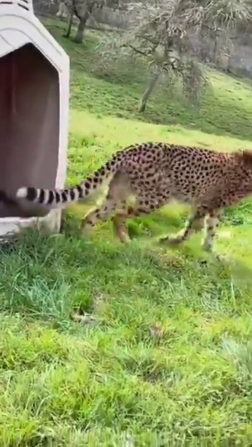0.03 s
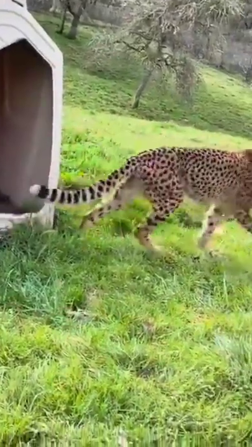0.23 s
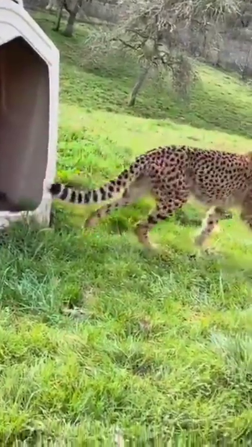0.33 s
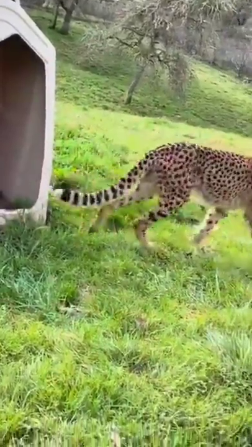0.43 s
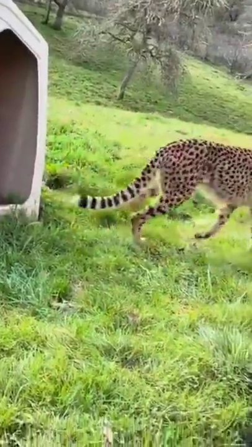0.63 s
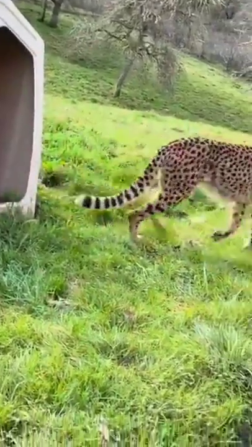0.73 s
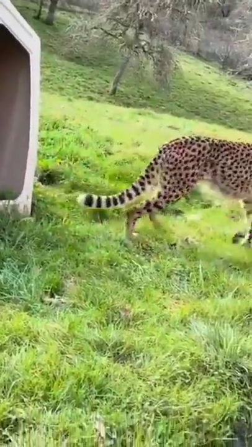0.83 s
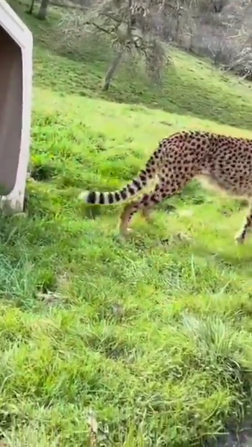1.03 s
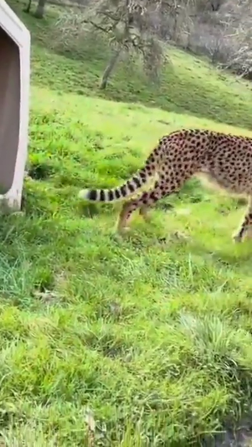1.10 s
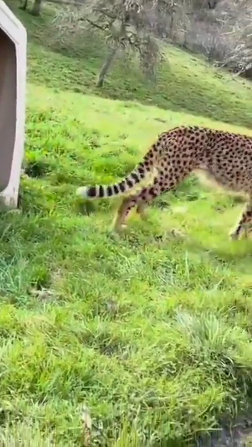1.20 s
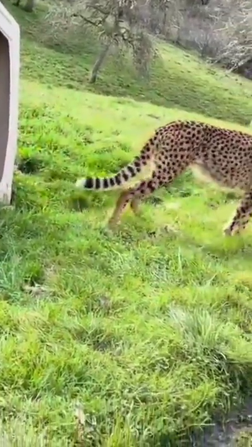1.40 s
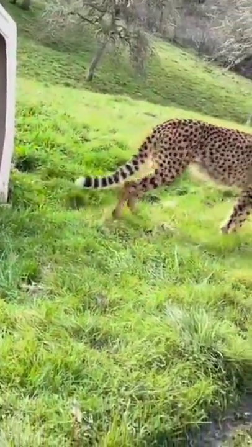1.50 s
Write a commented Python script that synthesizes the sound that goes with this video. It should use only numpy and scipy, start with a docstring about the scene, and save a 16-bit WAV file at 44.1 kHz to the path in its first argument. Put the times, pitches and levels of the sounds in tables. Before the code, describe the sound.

One brief, breathy big cat chirp over soft grass rustle and a low rumble.

```python
"""A big cat on a grassy slope, heard from one microphone in the open, over a low rumble and steady air.
Grass swishes at its first steps while far birds whistle. At 0.19 s it gives one short chirp, a clear
voice with a breathy rasp that arches up and down in pitch and is gone by 0.45 s. The hillside returns
a long faint tail, a far bird whistles again, and the steps swish on until about 1.3 s."""
import sys
import numpy as np
from scipy import signal
from scipy.fft import rfft, irfft
from scipy.io import wavfile
from scipy.ndimage import uniform_filter1d

SR = 44100
rng = np.random.default_rng(int(sys.argv[2]) if len(sys.argv) > 2 else 0)


def wrap_up_sound(samples):
    """Save the sound to the file named by the first command line argument, as 16-bit audio."""
    columns = np.atleast_2d(samples).T
    # keep every value between -1 and 1, then stretch to whole-number steps
    tamed = np.clip(columns, -1, 1)
    steps = np.round(tamed * 32767).astype(np.int16)
    wavfile.write(sys.argv[1], SR, steps)


N = 68355
t = np.arange(N) / SR


def amp(db):
    """Decibels to amplitude."""
    return 10 ** (np.asarray(db) / 20)


def rms_one(x):
    """Scale to rms 1."""
    return x / np.sqrt(np.mean(x ** 2) + 1e-20)


def energy_one(x):
    """Scale to total energy 1."""
    return x / np.linalg.norm(x)


def in_time(rows):
    """Columns joined by straight lines in time, held at the ends."""
    times, *columns = np.transpose(rows)
    return [np.interp(t, times, column) for column in columns]


def sounding(rows):
    """A soft-edged gate, open from the first row's time to the last."""
    return uniform_filter1d(((t >= rows[0][0]) & (t < rows[-1][0])) * 1., size=200)


def swell(peak_s, rise_s, fall_s):
    """A bell curve with its own width on each side."""
    return np.exp(-((t - peak_s) / np.where(t < peak_s, rise_s, fall_s)) ** 2 / 2)


def at_hz(spectrum, hz):
    """A spectrum's level in dB, read along log frequency."""
    freqs, db = np.transpose(spectrum)
    return np.interp(np.log(np.maximum(hz, 1)), np.log(freqs), db)


def drift(rate_hz):
    """Smooth random wander, rms 1."""
    pole = np.exp(-2 * np.pi * rate_hz / SR)
    return rms_one(signal.lfilter([1], [1, -2 * pole, pole * pole], rng.standard_normal(N + SR))[SR:])


def coloured(noise, spectrum):
    """Noise shaped by a spectrum and cut below its first row, rms 1."""
    hz = np.arange(N // 2 + 1) * SR / N
    low_cut = np.minimum(1, (hz / spectrum[0][0]) ** 6)
    return rms_one(irfft(rfft(noise) * amp(at_hz(spectrum, hz)) * low_cut, N))


# The cat's voice, in the foreground: t/s, pitch f/Hz, effort/dB, 2nd harmonic gain/dB, 4th harmonic gain/dB
CAT_VOICE = [(.187, 529, -53.5, -6, -28.5), (.195, 530, -39.5, 0, -14), (.202, 528, -34, 3.5, -5),
             (.208, 575.8, -24, -1, -13), (.214, 702.1, -22, 1, -20.5), (.22, 721.6, -23.5, 3.5, -15),
             (.226, 763.3, -18.5, 10, -13), (.232, 782.8, -14.5, 16, -14), (.238, 820, -24.5, 8, -28),
             (.248, 823, -18.5, 11, -5.5), (.256, 825.8, -19, 19.5, -1.5), (.264, 776.6, -13.5, 18.5, -11),
             (.28, 714.2, -19.5, 5, -12), (.296, 632, -17.5, 4.5, -32), (.306, 597.5, -24.5, 1, -8),
             (.322, 527.8, -35, 8, 3), (.334, 513, -41.5, -10.5, -15.5), (.348, 465, -50.5, 1.5, -10),
             (.362, 464, -54, 4.5, 9), (.374, 479.7, -60, 10, -18), (.388, 533, -45, -17.5, -29),
             (.4, 530, -50, -9.5, -21), (.424, 448.2, -59, 9.5, -9), (.432, 412.2, -52.5, -12, -18),
             (.44, 233.2, -63.5, -5.5, -28), (.452, 148.7, -59.5, -22, -25)]
# Resonances of its throat: f/Hz, gain/dB
THROAT_RESONANCES = [(200, 7), (520, 0.5), (620, -28.5), (720, -18.5), (790, -14), (830, -6), (1000, 0.5),
                     (1230, -1), (1420, -4), (1560, -24), (1660, -26), (1820, -26.5), (1950, -20),
                     (2140, -2.5), (2300, -9.5), (2470, 2), (2700, -5.5), (3000, -15), (3300, -24),
                     (3700, -15.5), (4200, -28), (4600, -27.5), (6400, -25), (6900, -35), (7300, -55)]
# Air rushing in the throat: f/Hz, relative level/dB
RASP_SPECTRUM = [(1650, -42.5), (2800, 3), (3400, -7), (4000, -11), (4760, -17), (6470, -5), (6900, -25),
                 (7200, -30.5), (8800, -20.5), (10000, -11.5), (12700, -11), (13400, -21), (14500, -15),
                 (15600, -27)]
# That rush through the call: t/s, relative level/dB
RASP_ENVELOPE = [(.19, -89), (.205, -73), (.22, -55.5), (.232, -53), (.25, -51), (.268, -48.5),
                 (.285, -53.5), (.31, -61.5), (.335, -74.5), (.355, -75.5), (.37, -89.5), (.39, -105)]


def chirp():
    """Clean harmonics shaped by the throat, high ones wavering, plus air noise pulsing with each cycle."""
    hz, effort_db, second_db, fourth_db = in_time(CAT_VOICE)
    rasp_db, = in_time(RASP_ENVELOPE)
    hz = uniform_filter1d(hz, size=200) * (1 + .002 * drift(rate_hz=150))  # slight jitter
    phase = 2 * np.pi * np.cumsum(hz) / SR
    voice = 0
    for k in range(1, 13):
        waver_db = 4 * drift(rate_hz=50)
        if k <= 4:
            db = effort_db + (k == 2) * second_db + (k == 4) * fourth_db
        else:  # high harmonics rise and fall with the rasp
            db = rasp_db + 20.5 + waver_db
        voice += amp(db + at_hz(THROAT_RESONANCES, k * hz)) * np.sin(k * phase)
    pulsing = 1 + .4 * np.cos(phase)
    rasp = amp(rasp_db + 8.5) * coloured(rng.standard_normal(N) * pulsing, RASP_SPECTRUM)
    return np.sqrt(2) * voice * sounding(CAT_VOICE) + rasp * sounding(RASP_ENVELOPE)


# Echoes off the ground and a shelter nearby: delay t/s, level/dB
NEAR_ECHOES = [(.018, -21), (.033, -27), (.055, -25.5)]


def hillside(sound, tail_t60_s=.99, scatter_t60_s=.22):
    """The sound with near echoes, a short scatter, a dull long tail and one blurred far echo."""
    late_s = np.maximum(t - .03, 0)
    build_up = 1 - np.exp(-late_s / .05)
    tail = amp(-35) * energy_one(build_up * amp(-60 * late_s / tail_t60_s))
    # The return from a far slope ends at its ridge.
    far_echo = amp(-46) * energy_one(swell(peak_s=.645, rise_s=.28, fall_s=.01))
    dull = signal.butter(2, 3000, fs=SR, output="sos")
    far = signal.sosfilt(dull, (tail + far_echo) * rng.standard_normal(N))
    scatter = amp(-23) * energy_one(amp(-60 * t / scatter_t60_s) * rng.standard_normal(N))
    response = far + scatter
    for delay_s, db in NEAR_ECHOES:
        response[int(delay_s * SR)] += amp(db)
    return sound + signal.fftconvolve(sound, response)[:N]


# Steps through the grass: peak t/s, hiss level/dB, crunch level/dB, rise t/s, fall t/s
STEP_SWISHES = [(.045, -70.5, -79.5, 0.049, 0.011), (0.141, -78, -88.5, 0.049, 0.11),
                (0.521, -80.5, -80, 0.079, 0.042), (.835, -71, -81.5, 0.059, 0.057),
                (.98, -88, -94, 0.039, .03), (1.07, -96, -87, .015, 0.037), (1.18, -86, -91, 0.053, 0.017),
                (1.23, -88, -82, 0.008, 0.018)]
# Hiss of the blades: f/Hz, relative level/dB
BLADE_SPECTRUM = [(1650, -64), (2800, -8.5), (4760, -9), (5860, -20.5), (6200, -6.5), (7050, -3),
                  (8870, -17), (10000, -7), (12100, -1.5), (13100, -0.5), (15500, -8)]


def grass(clicks_per_s=6000):
    """Dense tiny blade clicks under a soft swell for each swish: a bright hiss and a duller crunch."""
    clicks = (rng.random((2, N)) < clicks_per_s / SR) * rng.standard_normal((2, N))
    hiss = coloured(clicks[0], BLADE_SPECTRUM)
    crunch_band = signal.butter(2, [2999, 5100], "band", fs=SR, output="sos")
    crunch = rms_one(signal.sosfilt(crunch_band, clicks[1]))
    return sum(swell(peak_s, rise_s, fall_s) * (amp(hiss_db) * hiss + amp(crunch_db) * crunch)
               for peak_s, hiss_db, crunch_db, rise_s, fall_s in STEP_SWISHES)


# Birds far from the microphone, one list a whistle: t/s, f/Hz, level/dB
FAR_WHISTLES = [
    [(0, 3020, -86), (.06, 2980, -85), (.075, 2950, -90), (.1, 2850, -85), (.14, 2720, -81),
     (.165, 2650, -95)],
    [(.135, 5600, -92), (.155, 5150, -83), (.185, 4800, -83), (.2, 4800, -95)],
    [(.46, 5700, -95), (.49, 5420, -84), (.505, 5090, -76), (.522, 4900, -69), (.545, 4720, -77),
     (.575, 4690, -70), (.605, 4550, -84), (.635, 4460, -79), (.665, 4290, -87), (.685, 4230, -79),
     (.71, 4050, -83), (.738, 3890, -77), (.75, 3860, -95)],
]


def birds(flutter_db=4.5):
    """Falling near-sine whistles that flutter in level and pitch."""
    whistles = 0
    for rows in FAR_WHISTLES:
        hz, db = in_time(rows)
        level = amp(db + flutter_db * drift(rate_hz=60)) * sounding(rows)
        hz = hz * (1 + .005 * drift(rate_hz=90))
        whistles += np.sqrt(2) * level * np.sin(2 * np.pi * np.cumsum(hz) / SR)
    return whistles


# Rumble in the distance: f/Hz, relative level/dB
RUMBLE_SPECTRUM = [(12, -65.5), (20, -36), (36, -8), (49, 3.5), (124, -1), (201, -6), (255, -7),
                   (290, -12.5), (335, -17), (600, -20.5), (780, -44.5), (1320, -120)]
# Its course at the microphone: t/s, level/dB
RUMBLE_ENVELOPE = [(0.0, -54.5), (0.012, -56.5), (0.426, -54), (0.452, -50.5), (0.854, -56.5), (0.88, -51),
                   (0.922, -57.5), (1.514, -56), (1.55, -58.5)]


def rumble(lumps_db=1):
    """Far low noise, lumpy in level."""
    db, = in_time(RUMBLE_ENVELOPE)
    return amp(db + lumps_db * drift(rate_hz=10)) * coloured(rng.standard_normal(N), RUMBLE_SPECTRUM)


# Open air all around the microphone: f/Hz, relative level/dB
AIR_SPECTRUM = [(290, -30), (500, -8.5), (706, -11.5), (1010, -9.5), (1070, -20.5), (1130, -8),
                (1240, -18.5), (1880, -16), (2970, -28), (10400, -45.5), (15500, -46.5)]


def outdoor_air():
    """A faint steady hush above the rumble."""
    return amp(-70.5) * coloured(rng.standard_normal(N), AIR_SPECTRUM)


def scene():
    """Cat and birds echo off the hillside; grass, rumble and air join them in one channel."""
    return (hillside(chirp() + birds()) + grass() + rumble() + outdoor_air())[None]


def record(dry, cutoff_hz=15665):
    """The highest treble is cut steeply."""
    return signal.sosfilt(signal.ellip(12, .3, 85, cutoff_hz, fs=SR, output="sos"), dry)


dry = scene()
out = record(dry)
wrap_up_sound(out)
```